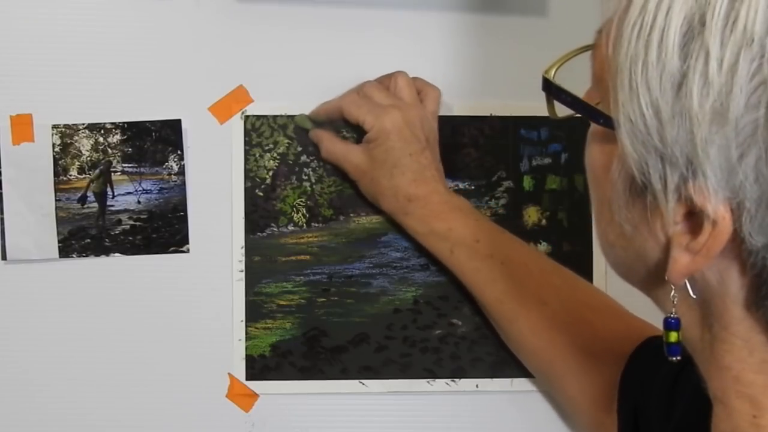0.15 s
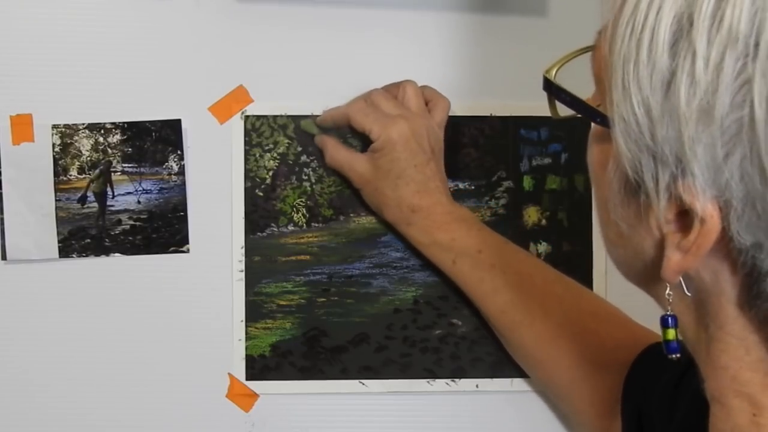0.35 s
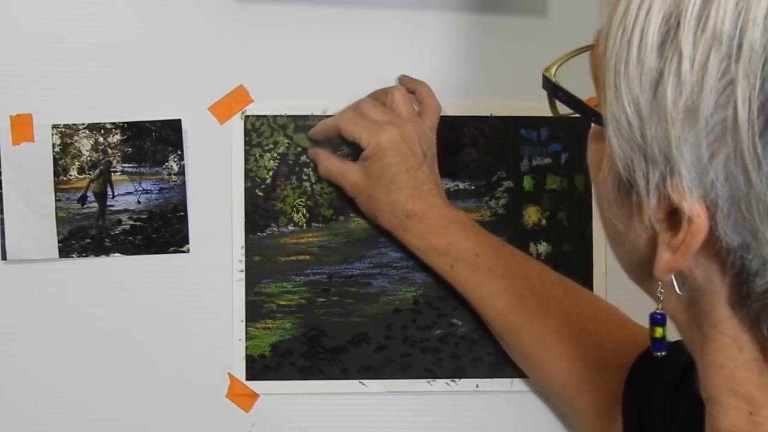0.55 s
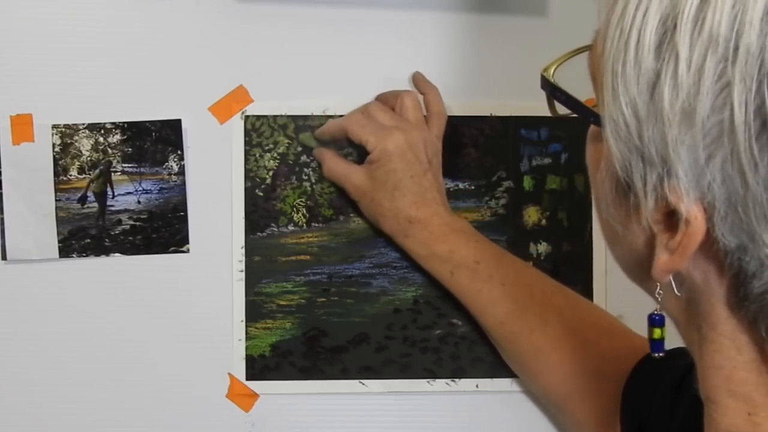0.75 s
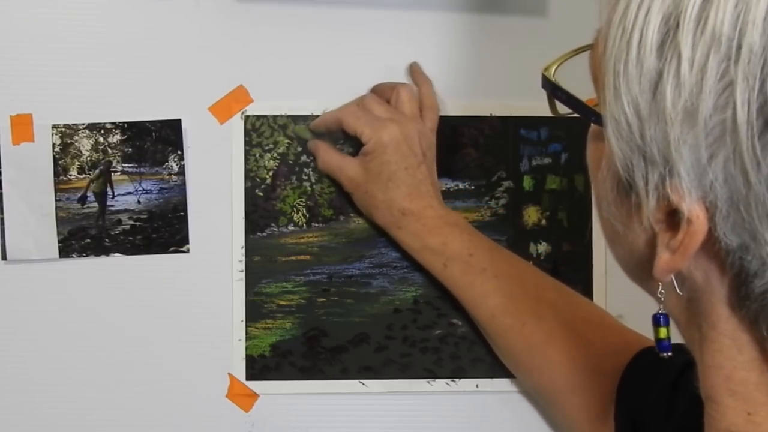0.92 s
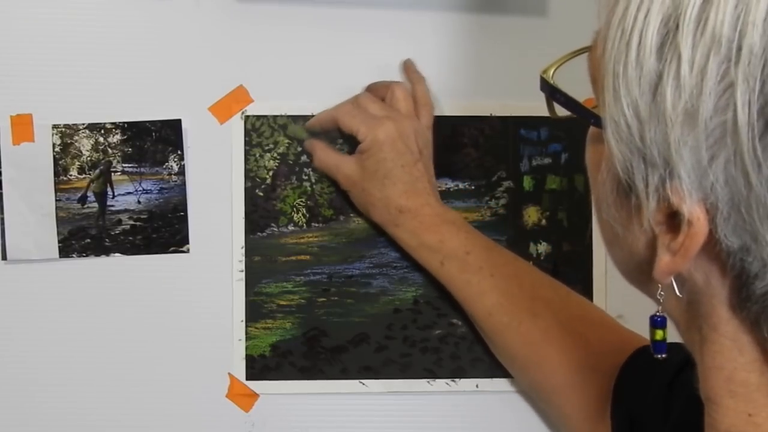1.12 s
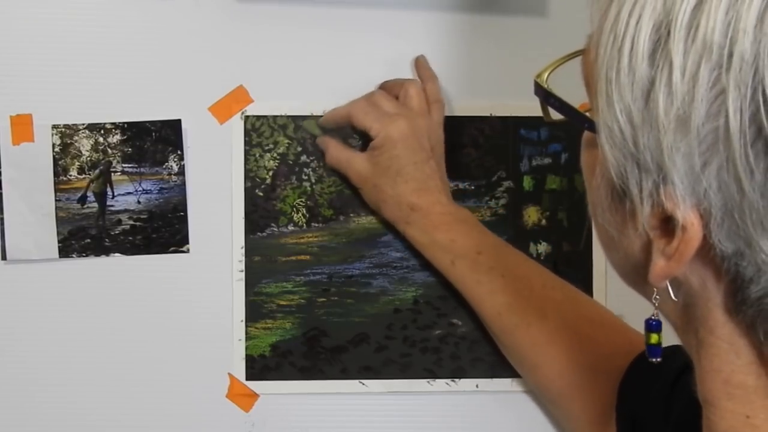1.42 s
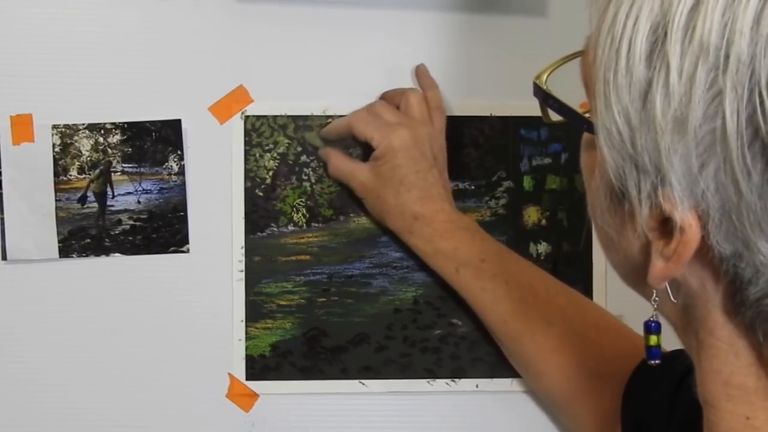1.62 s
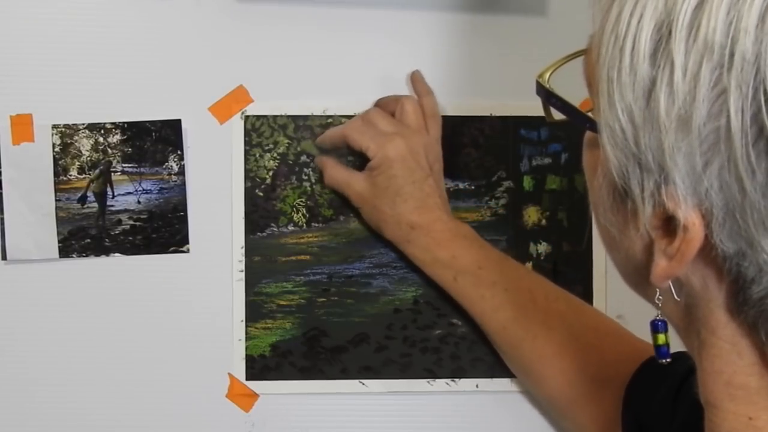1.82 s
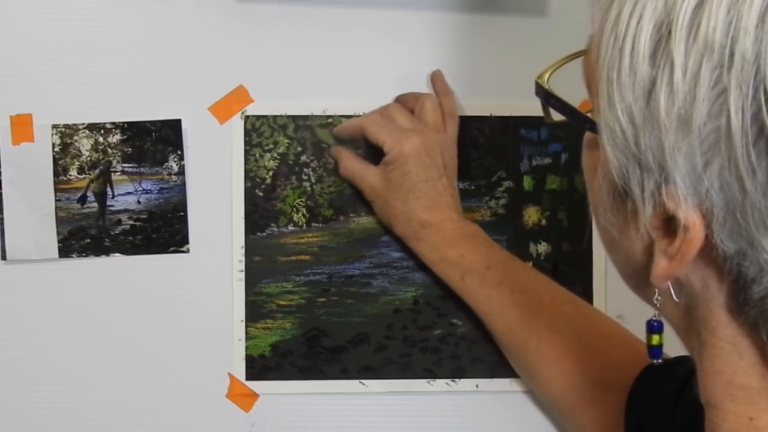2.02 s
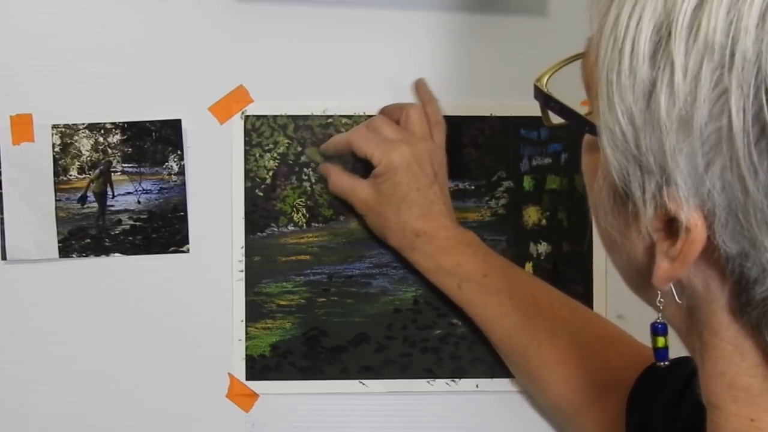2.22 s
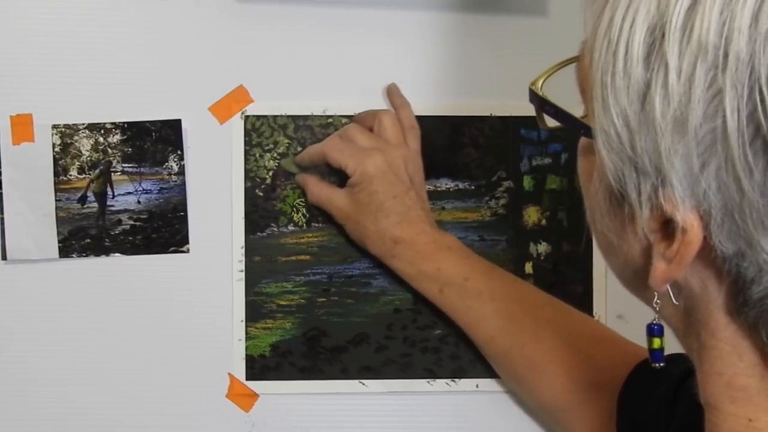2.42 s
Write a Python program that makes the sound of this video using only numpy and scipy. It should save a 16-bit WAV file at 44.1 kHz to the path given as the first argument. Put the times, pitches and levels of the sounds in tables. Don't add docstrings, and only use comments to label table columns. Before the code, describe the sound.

Light dry taps and short crumbly drags of pastel on paper grow into firmer knocks with slight sheet rattles, then soften again, heard about a metre away in a small quiet room with faint hiss.

```python
import sys
import numpy as np
from scipy import signal
from scipy.fft import rfft, irfft
from scipy.io import wavfile
from scipy.ndimage import uniform_filter1d

SR = 44100
rng = np.random.default_rng(int(sys.argv[2]) if len(sys.argv) > 2 else 0)


def voltage_ratio(decibels):
    exponent = np.asarray(decibels, float) / 20
    return 10 ** exponent


def inscribe(sig):
    pcm = np.round(np.clip(np.atleast_2d(sig).T, -1, 1) * 32767)
    wavfile.write(sys.argv[1], SR, pcm.astype(np.int16))


N = 112454

# pitch_hz, level_db [dB per Hz]
ROOM_RUMBLE = [(30, -1.5), (70, -9.5), (125, -13), (165, -3), (215, -7.5), (270, -21.5), (600, -25),
               (1500, -28.5)]
# pitch_hz, level_db [dB per Hz]
MIC_HISS = [(1000, -12.5), (1500, -8), (5000, -6), (9000, -8), (11500, -15.5), (13500, -25), (16000, -10.5)]
# time_s, level_db
HAND_STIR = [(0, -68), (.25, -67), (.6, -60.5), (.85, -58), (1.15, -59), (1.4, -65.5), (1.65, -56.5),
             (1.85, -58), (2.1, -53), (2.3, -61), (2.4, -90), (2.55, -66)]
# pitch_hz, level_db [dB per Hz]
SLAP_COLOUR = [(50, 0), (100, 4), (300, -7), (700, -9.5), (1300, -16.5), (2500, -21.5), (5000, -25.5)]
# start_s, peak_db, pitch_hz, width_hz
TICKS = [(0.0534, -36, 8700, 2000), (0.0555, -43, 8600, 1200), (0.0598, -33, 8550, 1000),
         (0.0668, -40, 8700, 1010), (0.108, -37.5, 8940, 1200), (0.1345, -34.5, 8100, 1500),
         (0.1363, -43, 8300, 1500), (0.1381, -47, 8850, 1500), (0.2558, -42, 8500, 1500),
         (0.269, -35.5, 8400, 1500), (0.2765, -37, 8400, 2000), (0.2835, -31, 8500, 1980),
         (0.4113, -36, 9000, 2000), (0.415, -36, 8800, 1500), (0.4412, -44, 8900, 1500),
         (0.537, -26, 8850, 3020), (0.682, -37, 8670, 2500), (0.7148, -55, 9000, 1500),
         (0.7947, -36, 8900, 2500), (0.9632, -53, 8800, 2000), (1.0502, -36.5, 9200, 2500),
         (1.2092, -27, 7360, 3500), (1.2185, -50, 6500, 1500), (1.2603, -24, 8000, 2000),
         (1.2685, -22, 8700, 2500), (1.2814, -23, 8200, 2500), (1.2843, -24, 7850, 2500),
         (1.5321, -11.5, 6010, 5100), (1.7258, -16.5, 7440, 5500), (1.892, -27.5, 9700, 3500),
         (2.018, -35, 8900, 2000), (2.0672, -48, 9000, 1500), (2.163, -37, 5800, 2500),
         (2.1927, -40, 8500, 2000), (2.222, -32.5, 9600, 2450)]
# pitch_hz, level_db
PAPER_COLOUR = [(1500, -17), (3500, -12), (5000, 0), (9500, 1), (11000, -18), (13000, -23), (17000, -15)]
# start_s, rise_s, hold_s, level_db
DRAGS = [(0.052, 0.0022, 0.006, -44.5), (0.062, 0.0022, 0.0091, -57), (0.073, 0.0045, 0.04, -60),
         (0.124, 0.01, 0.0044, -48), (0.248, 0.0094, 0.003, -47), (0.26, 0.0052, 0.0057, -48),
         (0.272, 0.0039, .013, -46.5), (0.408, 0.0026, 0.011, -53), (0.433, 0.0071, 0.0053, -52.5),
         (0.534, 0.002, 0.021, -51.5), (0.679, 0.0038, 0.018, -58), (0.706, 0.0086, 0.0074, -49.5),
         (0.791, 0.0034, 0.032, -54.5), (0.848, 0.0025, 0.0032, -57), (0.892, .02, 0.04, -63),
         (0.954, 0.011, 0.0025, -47.5), (1.047, 0.0021, 0.039, -53), (1.201, 0.0021, 0.038, -59),
         (1.238, 0.02, 0.025, -39.5), (1.502, 0.016, 0.008, -53.5), (1.522, .001, 0.034, -52),
         (1.694, 0.022, 0.0042, -56), (1.723, 0.0035, 0.019, -52), (1.881, 0.00095, 0.037, -58),
         (2.021, .002, 0.023, -62), (2.047, 0.016, 0.013, -52.5), (2.135, 0.006, 0.049, -61),
         (2.162, 0.038, 0.026, -48.5)]
# pitch_hz, level_db [dB per Hz]
EDGE_GRIT = [(1500, -19), (4200, -19), (5400, -6.5), (7600, -3.5), (8900, -1), (10700, -11.5), (12100, -29),
             (16000, -33)]
# pitch_hz, level_db [dB per Hz]
FLAT_GRIT = [(500, -41), (900, 7.5), (2000, 0), (4500, 3), (7000, -6), (11000, 0), (16000, -30)]
# time_s, level_db
FLAT_SHARE = [
    (0, -31),
    (.5, -7),
    (1.0, -12),
    (1.3, -22),
    (1.55, -3.5),
    (1.75, -3.5),
    (1.9, 1),
    (2.07, -6),
    (2.25, -6),
]
# pitch_hz, level_db [dB per Hz]
THIN_RING = [(7000, -26), (8200, -39), (8800, 6), (9500, -3), (11000, -26)]
# start_s, peak_db, upper_modes_db, lowest_modes_db, slap_db
THUMPS = [(0.098, -70, -26, 2, 6), (0.219, -47.5, -5, -7, 9.5), (0.33, -47.5, -9, 1, 5.5),
          (0.36, -46.5, -10, 8, 3.5), (0.407, -44, 0, -3, 5), (0.538, -30, -2.5, 7.5, -1.5),
          (0.618, -57, -7, 10, 16.5), (0.685, -44, 0, 10, -0.5), (0.721, -48.5, 2, -6, 5),
          (0.765, -43, -8, -15, 1), (0.79, -40, 4.5, -10, 0), (0.914, -39.5, 3.5, -3, 0.5),
          (0.963, -45, 2, 4, -13), (1.049, -37.5, -3, 4, -2.5), (1.134, -48, -1, 1, 10),
          (1.209, -40, 7, -2, 3.5), (1.502, -49.5, -3.5, -4, 8), (1.534, -23, -4, 3.5, -3.5),
          (1.576, -35, -10, 7, -5), (1.725, -30, 6, 10, 0), (1.767, -37, -7, -17, -5),
          (1.797, -44, -12, -12, -7), (1.89, -22, 4.5, -8, -5.5), (1.934, -46, -2, -8, 0),
          (2.016, -28.5, -1, -14, -0.5), (2.059, -41, 4.5, 2, -6), (2.162, -36, 2, 2, -2),
          (2.205, -41.5, -10, -4, 6), (2.278, -50, 1, 16, 4), (2.403, -51, -7, 4, -8)]
# pitch_hz, level_db, t60_s
BOARD_MODES = [(72.3, -20, 0.17), (108.7, -3, 0.12), (147, -4.5, 0.11), (189.7, 3, 0.12),
               (202, -11.5, 0.085), (301, -6, 0.23), (360, -14, 0.049), (470.5, -4.5, 0.071),
               (535, -1.5, 0.11), (636, -19, 0.096), (748, -12.5, 0.11), (966, -12.5, 0.064),
               (1120, -15, 0.08), (1300, -14, 0.12)]
# start_s, peak_db, pitch_hz, t60_s
RATTLES = [(0.543, -38, 196, .06), (0.925, -47, 106, .08), (1.058, -40, 110, 0.1), (1.06, -45, 194, 0.092),
           (1.213, -46, 490, 0.077), (1.538, -38, 522, .05), (1.542, -42, 100, .07), (1.6, -45, 262, .08),
           (1.73, -38, 110, 0.094), (1.729, -38, 536, .06), (1.893, -42, 1120, 0.056),
           (1.893, -47, 1350, 0.051), (1.9, -39, 150, 0.08), (2.024, -41, 540, 0.071),
           (2.43, -53, 110, 0.17), (1.535, -35.5, 459, 0.073), (1.735, -59, 940, .05),
           (1.767, -46, 945, 0.063), (1.784, -43.5, 308, 0.13), (1.832, -50, 120, .06),
           (1.912, -46, 1030, 0.074), (2.02, -44, 730, 0.077), (2.029, -46, 976, 0.046),
           (2.06, -46, 850, .04)]
# pitch_hz, level_db
ROOM_BASS = [(20, -20), (120, -10), (250, 0), (20000, 0)]
# pitch_hz, level_db
MIC_RESPONSE = [(20, -23), (40, -19), (65, -1), (10500, -1), (13000, 5), (17000, -16.5)]


def level(x, db):
    return x * voltage_ratio(db) / np.sqrt(np.mean(x ** 2))


def colour(x, table):
    hz = np.arange(N // 2 + 1) * SR / N + 1e-3
    table_hz, table_db = np.array(table, float).T
    gain_db = np.interp(np.log(hz), np.log(table_hz), table_db, left=-90, right=-90)
    return irfft(rfft(x) * voltage_ratio(gain_db), N)


def follow(table):
    return np.interp(np.arange(N) / SR, *np.array(table).T)


def walk(rate_hz):
    k = int(SR / rate_hz)
    steps = np.repeat(rng.standard_normal(N // k + 1), k)
    w = uniform_filter1d(uniform_filter1d(steps, k), k)[:N]
    return w / w.std()


def decay(t, t60_s):
    return np.exp(-np.log(1000) * t / t60_s)


def even(x):
    return x / np.sqrt(uniform_filter1d(x ** 2, int(0.012 * SR)) + 1e-12)


def add(out, x, start_s):
    i = int(start_s * SR)
    out[i:i + len(x)] += x[:N - i]


def echo(x, db):
    return x + np.roll(x, int(0.0017 * SR)) * voltage_ratio(db)


def hush():
    rumble_db, hiss_db, hiss_side_db = -55.5, -61.5, 1
    noise = rng.standard_normal((4, N))
    left_right = np.array([[1], [-1]])
    mid = colour(noise[0], ROOM_RUMBLE) * voltage_ratio(1.2 * walk(6.54))
    side = colour(colour(noise[1], ROOM_RUMBLE), [(30, -6), (200, -6), (620, -3.0), (2000, 0)])
    hiss = colour(noise[2], MIC_HISS)
    hiss_side = voltage_ratio(hiss_side_db) * colour(noise[3], MIC_HISS)
    rumble = (mid + left_right * side) * voltage_ratio(rumble_db) / mid.std()
    return rumble + (hiss + left_right * hiss_side) * voltage_ratio(hiss_db) / hiss.std()


def stir():
    db = follow(HAND_STIR) + 2.7 * walk(39.8)
    return level(colour(rng.standard_normal(N), SLAP_COLOUR), 0) * voltage_ratio(db)


def ticks():
    tick_db, shiver_db, shiver_s, shiver_rise_s = 1, -17, 0.0012, 0.0009
    out, t = np.zeros(N), np.arange(300) / SR
    for start_s, db, hz, width_hz in TICKS:
        tone = np.sin(2 * np.pi * hz * t)
        chip = tone * t ** 2 * np.exp(-2 * np.pi * width_hz * t)
        flutter = even(uniform_filter1d(rng.standard_normal(300), int(SR / width_hz / 2)))
        shiver = tone * flutter * np.exp(-t / shiver_s) * np.clip(t / shiver_rise_s, 0, 1)
        tick = chip / np.abs(chip).max() + voltage_ratio(shiver_db) * shiver
        add(out, voltage_ratio(db + tick_db) * tick, start_s + 0.0011)
    return echo(colour(out, PAPER_COLOUR), -4)


def pressure():
    lift_s = 0.0013
    t, press = np.arange(N) / SR, np.zeros(N)
    for start_s, rise_s, hold_s, db in DRAGS:
        u = t - start_s
        rise = np.clip(u / max(rise_s, 1e-4), 0, 1) ** 2
        lift = np.exp(-np.clip(u - rise_s - hold_s, 0, None) / lift_s)
        press += voltage_ratio(db) * rise * lift
    return press


def grit(press):
    grains_per_s, spread_db, patch_db = 8000, 3, 3.2
    thin_db, light_db = -16.5, -26
    chance, size = rng.random((2, N))
    clicks = (chance < grains_per_s / SR) * voltage_ratio(-spread_db * np.log(size + 1e-9))
    clicks = clicks * rng.choice([-1, 1], N)
    clicks = even(clicks * voltage_ratio(patch_db * walk(400)))
    edge = level(colour(clicks, EDGE_GRIT), 0)
    thin = level(colour(clicks, THIN_RING), thin_db) / (1 + press / voltage_ratio(light_db))
    flat = voltage_ratio(follow(FLAT_SHARE)) * level(colour(clicks[::-1], FLAT_GRIT), 0)
    return (edge + thin + flat) * press


def board_ring(t, turn=0, drift=0, trim_db=0):
    hz, db, t60_s = np.array(BOARD_MODES, float).T[:, :, None]
    tone = np.sin(2 * np.pi * (hz * (1 + drift) * t + turn))
    return voltage_ratio(db + trim_db) * tone * decay(t, t60_s)


def rub(press):
    ring = board_ring(np.arange(int(0.3 * SR)) / SR).sum(0)
    friction = rng.standard_normal(N) * np.sqrt(press * voltage_ratio(-59.5))
    return voltage_ratio(-36.5) * signal.fftconvolve(friction, ring)[:N]


def thumps():
    push_s, thump_db, scatter_db, drift, turn_scatter = 0.00098, -7, 1.5, 0.012, 0.08
    grip_s, free_db = 0.017, -7.5
    settle_s, slap_t60_s, slap_rms_db = 0.002, 0.22, -13.5
    t, out, slap = np.arange(int(0.3 * SR)) / SR, np.zeros(N), np.zeros(N)
    hz = np.array(BOARD_MODES, float)[:, :1]
    push = np.hanning(int(push_s * SR) + 3)
    bloom = 1 - np.exp(-t * hz / 0.31)
    grip = voltage_ratio(free_db) + (1 - voltage_ratio(free_db)) * np.exp(-(t / grip_s) ** 2)
    slap_shape = (1 - np.exp(-t / settle_s)) * decay(t, slap_t60_s)
    for start_s, db, upper_db, lowest_db, slap_db in THUMPS:
        chance = rng.standard_normal((3, len(BOARD_MODES), 1))
        trim_db = scatter_db * chance[0] + upper_db * (hz > 400) + lowest_db * (hz < 130)
        modes = board_ring(t, 0.5 + turn_scatter * chance[2], drift * chance[1], trim_db)
        ring = (modes * bloom).sum(0) * grip
        add(out, voltage_ratio(db + thump_db) * np.convolve(ring, push / push.sum()), start_s + 0.00205)
        add(slap, voltage_ratio(db + slap_db) * slap_shape, start_s + 0.0019)
    return out + slap * level(colour(rng.standard_normal(N), SLAP_COLOUR), slap_rms_db)


def rattles():
    out, t = np.zeros(N), np.arange(int(0.15 * SR)) / SR
    for start_s, db, hz, t60_s in RATTLES:
        tone = np.sin(2 * np.pi * hz * t) * (1 - np.exp(-t * hz))
        add(out, voltage_ratio(db) * tone * decay(t, t60_s), start_s)
    return out


def room(x, db):
    t60_s, gap_s = 0.18, 0.002
    t = np.arange(int(0.5 * SR)) / SR
    tail = rng.standard_normal((2, len(t))) * decay(t, t60_s) * np.clip(t / gap_s - 1, 0, 1)
    tail *= voltage_ratio(db) / np.sqrt((tail ** 2).sum(1, keepdims=True))
    return signal.fftconvolve(x[None], tail, axes=1)[:, :N]


def scene():
    press = pressure()
    paper = ticks() + echo(grit(press), -8)
    wood = stir() + rub(press) + thumps() + rattles()
    ringing = room(paper, -3.5) + room(colour(wood, ROOM_BASS), -9)
    return hush() + paper + wood + ringing


def top_cut(x):
    return signal.sosfilt(signal.butter(12, 15900, fs=SR, output="sos"), x)


def record(dry):
    mix = np.array([colour(channel, MIC_RESPONSE) for channel in dry])
    return top_cut(mix)


dry = scene()
out = record(dry)
inscribe(out)
```